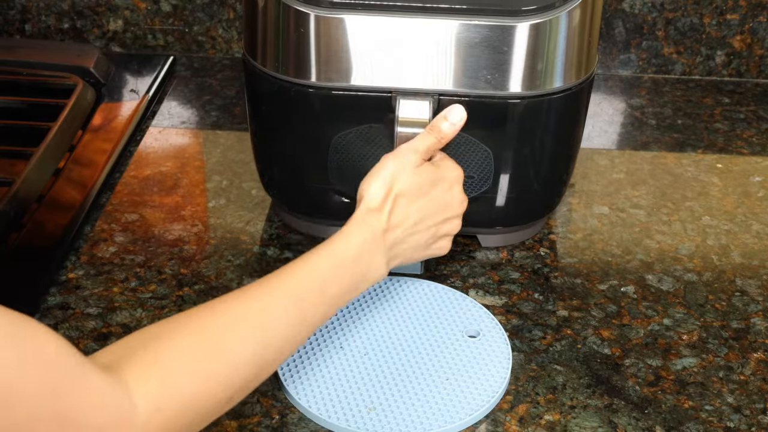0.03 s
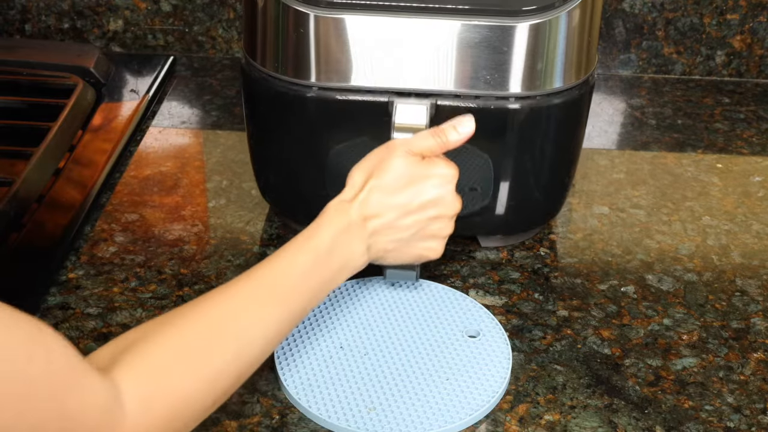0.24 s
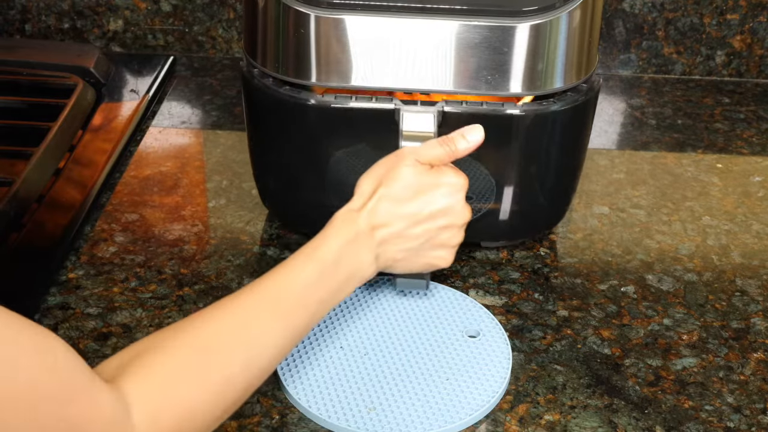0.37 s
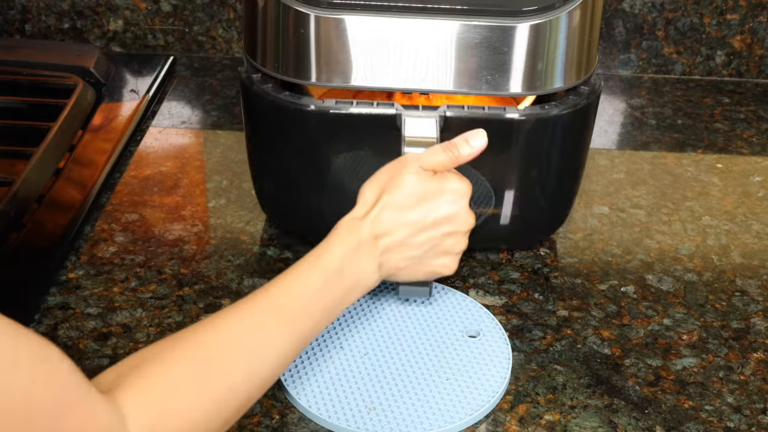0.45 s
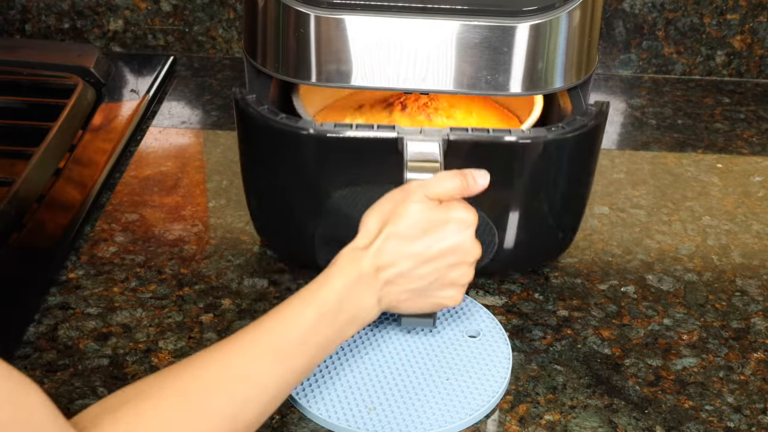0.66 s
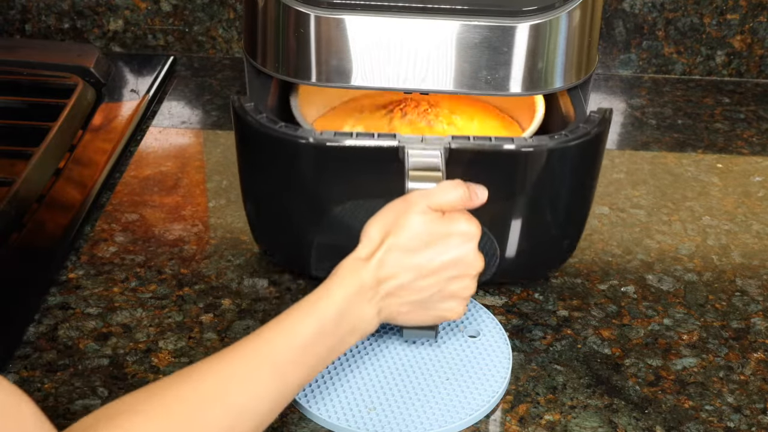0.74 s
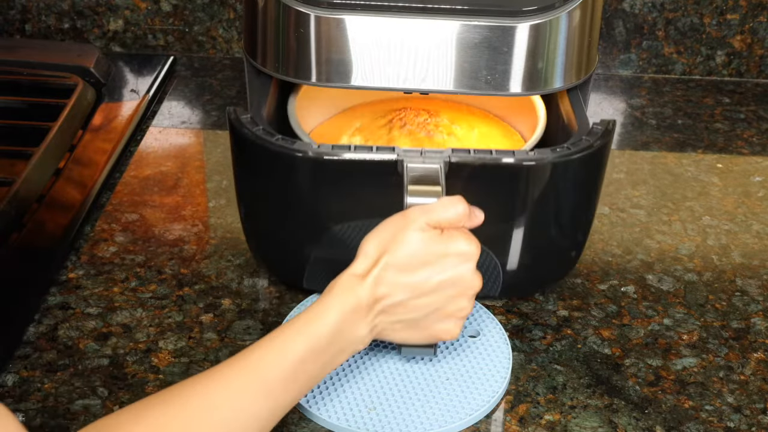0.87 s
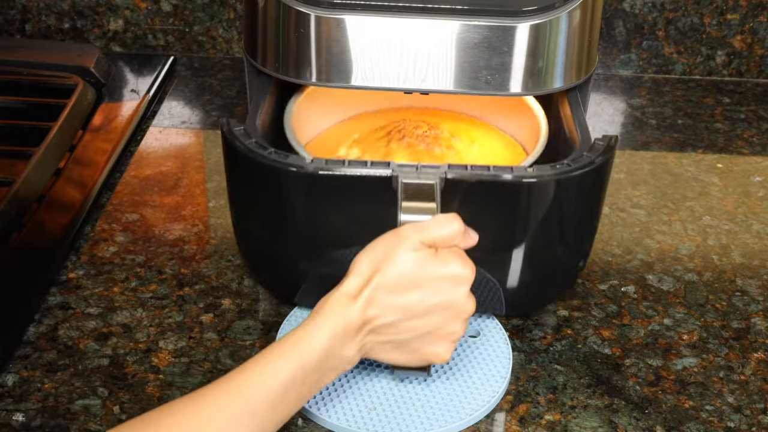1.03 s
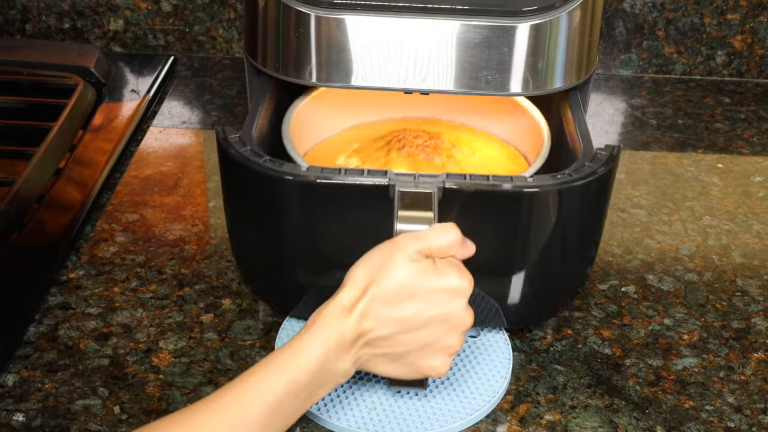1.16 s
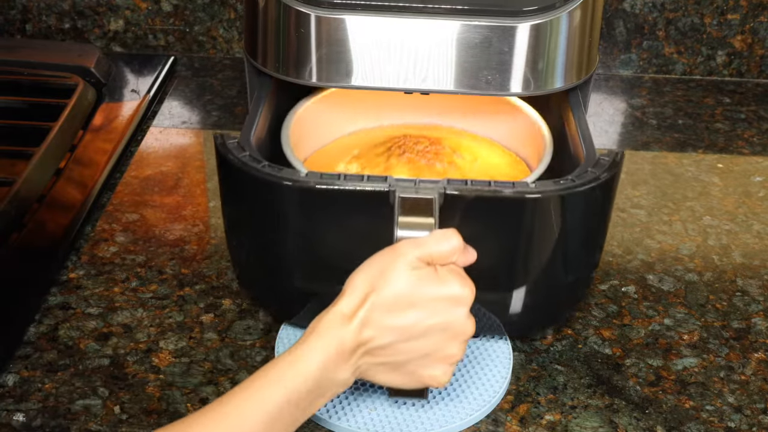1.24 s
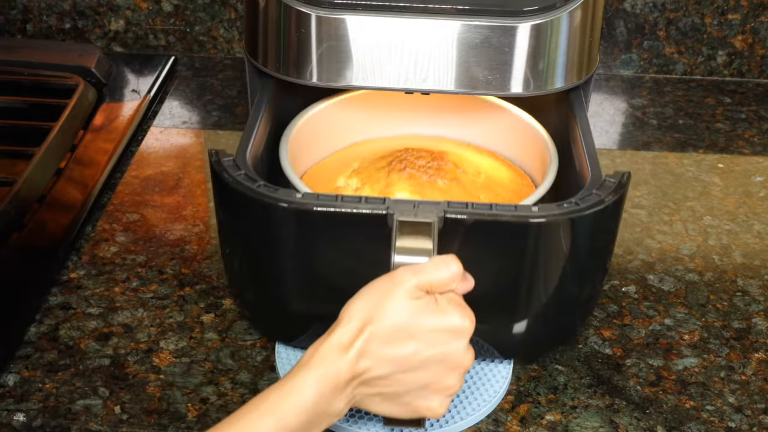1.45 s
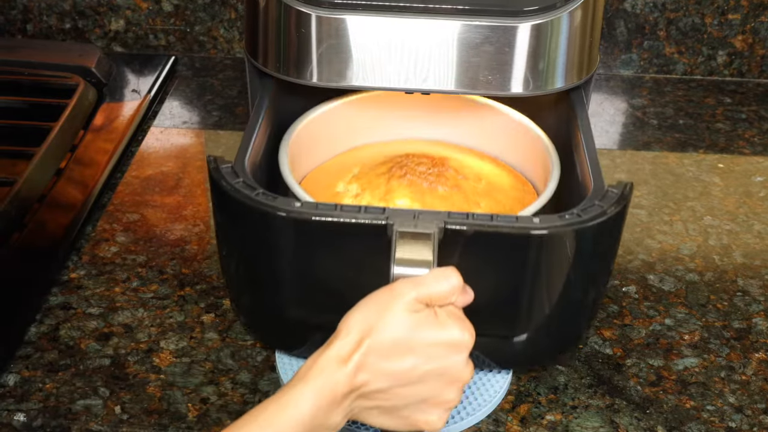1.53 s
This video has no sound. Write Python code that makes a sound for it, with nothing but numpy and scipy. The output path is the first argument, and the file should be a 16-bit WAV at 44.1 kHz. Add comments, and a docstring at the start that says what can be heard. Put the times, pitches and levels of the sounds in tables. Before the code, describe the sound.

An air fryer basket is pulled open in a quiet kitchen. Its catch lets go with a hard plastic clack, then the basket knocks dully and slides out with a soft scrape and faint squeaks, slightly to the right.

```python
"""An air fryer basket is pulled open on a stone counter in a kitchen.
A hand brushes the handle; the catch creaks under strain and lets go with a hard plastic clack that
rings the housing. The basket knocks dully on its runners and slides out with a soft stick-slip scrape
and faint squeaks, then bumps again more lightly as the pull slows and the scrape dulls.
Quiet room noise and mains hum lie underneath throughout."""
import sys
import numpy as np
from scipy import signal
from scipy.fft import rfft, irfft
from scipy.io import wavfile
from scipy.ndimage import uniform_filter1d

SR = 44100
rng = np.random.default_rng(int(sys.argv[2]) if len(sys.argv) > 2 else 0)


def file_out(sig):
    """Save sig as 16-bit WAV at sys.argv[1]."""
    # one column per channel
    cols = np.atleast_2d(sig).T
    # limit, then scale
    lim = np.clip(cols, -1, 1)
    pcm = np.round(lim * 32767).astype(np.int16)
    wavfile.write(sys.argv[1], SR, pcm)


N = 70560
T = np.arange(N) / SR

# stereo image of the room, narrow lows and wide highs: (frequency [Hz], left-right likeness [0..1])
ROOM_LIKENESS = [(100, 0.92), (500, 0.91), (1200, 0.6), (2800, 0.099), (6000, 0), (12000, 0.082)]


def catch():
    """The plastic catch creaks ever louder under strain, lets go with a crack and shakes the housing."""
    # hits as the catch strains and snaps free: (time [s], level [dB], dull above [Hz], thin below [Hz])
    hits = [(.2275, -18.5, 705, 250), (.2342, -21, 6000, 600), (.2424, -5, 5000, 1400),
            (.2490, -12.5, 5000, 397), (.2530, -2, 900, 201), (.2558, 0.5, 830, 197),
            (.2578, -0.5, 13000, 690), (.2623, -4, 7700, 388), (.2652, -1.5, 3500, 250),
            (.2895, -11, 700, 202)]
    # ringing tail of the housing: (frequency [Hz], level [dB], t60 [s])
    housing_modes = [(113.6, -26.5, 0.138), (176.95, -20, 0.62), (213, -33.5, 0.41), (244.3, -39, 0.78),
                     (285.2, -30, 0.84), (332.6, -31, .3), (391.7, -30.5, 0.99), (402.4, -22.5, 0.22),
                     (440.5, -28.5, 0.21), (489.1, -21, 0.32), (561, -32.5, 0.27), (929, -20.5, 0.096),
                     (1124.4, -34, 0.22), (1502, -30, 0.15), (2094, -26, 0.17), (2510, -23.5, .25),
                     (2765, -36, 0.21), (3320, -29, 0.043), (3860, -27, 0.1), (5263, -26.5, 0.05)]
    # body of the clack, the housing's dense, short-lived modes: (frequency [Hz], gain [dB])
    housing_colour = [(25, -32), (70, 15), (110, -10.5), (145, 6.5), (180, 9.5), (450, 8.5), (620, 4.5),
                      (1100, 3.5), (1700, 1), (3300, 4), (5500, -2.5), (8800, -7.5), (10800, -13),
                      (13000, -2.5), (16000, -9)]
    # bright EQ of creak and crack: (frequency [Hz], gain [dB])
    snap_colour = [(500, -49), (1500, -33), (3300, 1), (5500, 2), (8800, 8), (10800, -4), (13000, 10),
                   (16000, -2)]
    strain_s, snap_s = .2342, .2578
    creak_db, creak_rise_db, crack_db = -45.5, 12, 0.5
    strain = (T - strain_s) / (snap_s - strain_s)
    straining = (strain > 0) & (strain < 1)
    creak = slips() * straining * from_db(creak_db + creak_rise_db * np.clip(strain, 0, 1))
    crack = from_db(crack_db) * through(click(snap_s), burst(t60=0.0018))
    clack = struck(hits, housing_modes, housing_colour, dense_db=11.5, t60=0.052, wet_db=-4)
    return coloured(creak + crack, snap_colour) + clack


def knocks():
    """The basket bumps dully on its runners, early in the pull and again near its end."""
    # bumps on the runners: (time [s], level [dB], dull above [Hz], thin below [Hz])
    hits = [(.3945, -5, 2260, 305), (.4005, 1, 2040, 1120), (.4045, -2.5, 510, 110),
            (.4150, -7.5, 880, 148), (.4325, -6, 280, 40), (.4675, 0.5, 2020, 700),
            (.4725, -3.5, 2170, 700), (.4790, -4.5, 1240, 248), (1.152, -12.5, 1350, 600),
            (1.2765, -12, 926, 380), (1.2815, -5, 1020, 382), (1.304, -14, 1220, 506)]
    # ringing tail of the basket: (frequency [Hz], level [dB], t60 [s])
    basket_modes = [(176, -39, 0.25), (200.8, -37.5, 0.23), (247, -36, 0.16), (281.6, -46.5, 0.51),
                    (389.6, -41, 0.23), (403, -41.5, 0.26), (560, -43.5, 0.71), (760, -34, 0.099),
                    (856, -30, 0.1), (922, -39, 0.16), (1053, -40, 0.07), (1418, -36.5, 0.097),
                    (1543, -38, 0.14), (1623, -40, 0.11)]
    # body of the knock, the basket's dense modes: (frequency [Hz], gain [dB])
    basket_colour = [(30, -22), (110, 1.5), (145, -14), (180, 10), (400, 13), (640, 2.5), (800, 3),
                     (1600, 1.5), (3000, -5.5), (6000, -13.5), (14000, -7)]
    return struck(hits, basket_modes, basket_colour, dense_db=2, t60=0.062, wet_db=-1)


def slide():
    """Slips and smooth rubbing on the runners ring basket and room; the scrape dulls as the pull slows."""
    # friction envelope of the sliding basket: (time [s], level [dB])
    friction = [(.3, -14.5), (.48, -1), (.65, 1), (.87, -1), (1.0, -4), (1.08, -1), (1.17, 1), (1.26, -1.5),
                (1.45, -1), (1.6, -10)]
    # soft, mid-heavy EQ of the scrape: (frequency [Hz], gain [dB])
    scrape_colour = [(80, -17), (145, -16.5), (180, -3), (420, 0), (700, 0.5), (900, 2.5), (1300, -2),
                     (2500, -6.5), (5000, -16), (9000, -26), (15000, -28.5)]
    # resonances of the runners and the oven cavity: (frequency [Hz], width [Hz], boost [dB])
    resonances = [(178, 13, 6.5), (241, 8.6, 5.5), (407, 13, 8.5), (851, 26, 5.5), (920, 9.2, 8),
                  (1260, 20, 5.5), (1530, 53, 4)]
    friction_db, wet_db = -39, 1
    slows_at_s, dulling_db_per_s, dulls_above_hz = 1, 30, 1400

    def resonance_gain(hz):
        return 1 + sum((from_db(db) - 1) / (1 + 2j * (hz - centre) / width)
                       for centre, width, db in resonances)

    rubbing = (slips()[0] + 2 * rng.standard_normal(N)) / np.sqrt(5)
    force = rubbing * from_db(friction_db + np.interp(T, *np.transpose(friction)))
    response = (burst(t60=0.052) + from_db(wet_db) * kitchen()) / np.sqrt(2)
    scrape = coloured(through(force, response), scrape_colour)
    scrape = shaped(scrape, resonance_gain)
    bass = cut(scrape, dulls_above_hz, "low", order=1)
    treble_fade = from_db(-dulling_db_per_s * np.maximum(T - slows_at_s, 0))
    return bass + (scrape - bass) * treble_fade


def squeaks():
    """The runners stick and slip in brief, unsteady tones that sag in pitch as they fade."""
    # runner squeaks: (time [s], length [s], starting pitch [Hz], level [dB])
    cues = [(0.72, 0.046, 885, -59), (0.895, 0.049, 945, -44), (1.005, 0.042, 905, -52.5),
            (1.135, 0.1, 919, -55), (1.15, 0.081, 3190, -59), (1.446, .05, 925, -60)]
    attack_s, sag_hz_per_s, wobble_share, wet_db = 0.0042, 760, 0.0283, -5
    tones = 0
    for s, length, hz, db in cues:
        age = np.clip(T - s, 0, length)
        wobble = cut(rng.standard_normal(N), 84, "low")
        pitch = hz - sag_hz_per_s * age + wobble_share * hz * wobble / wobble.std()
        envelope = np.minimum(age / attack_s, 1) * np.sqrt(1 - age / length)
        tones = tones + from_db(db) * envelope * np.sin(2 * np.pi * np.cumsum(pitch) / SR)
    return tones + from_db(wet_db) * through(tones, kitchen())


def grip():
    """Skin brushes over the handle before the pull: one short swell of noise."""
    # EQ of skin on the handle: (frequency [Hz], gain [dB])
    skin_colour = [(300, 5), (1500, -3), (3000, -0.5), (5000, 3), (9000, -11), (15000, -7)]
    peak_s, width_s, level_db = 0.16, 0.02, -52
    swell = np.exp(-.5 * ((T - peak_s) / width_s) ** 2)
    return from_db(level_db) * swell * coloured(stereo_noise(ROOM_LIKENESS), skin_colour)


def struck(hits, modes, colour, dense_db, t60, wet_db):
    """Each hit rings a body's clear modes and a short burst of dense ones, and echoes in the room."""
    forces = [from_db(db) * cut(cut(click(s), dull_hz, "low"), thin_hz, "high", order=1)
              for s, db, dull_hz, thin_hz in hits]
    dense = sum(through(force, burst(t60)) for force in forces)
    room = from_db(wet_db) * through(sum(forces), kitchen())
    tail = cut(ring(sum(forces), modes), 87, "high")
    return tail + from_db(dense_db) * coloured(dense + room, colour)


def ring(force, modes):
    """A body's clear modes: decaying sines set off by the force."""
    response = sum(from_db(db - 60 * T / t60) * np.sin(2 * np.pi * hz * T) for hz, db, t60 in modes)
    return through(force, response[None])


def slips():
    """Tiny random slips of plastic on plastic, each ringing briefly; rms about 1."""
    slips_per_s, spread_db = 2500, 2.5
    sizes = rng.choice([-1, 1], N) * from_db(spread_db * np.minimum(rng.exponential(1, N), 4))
    clicks = (rng.random(N) < slips_per_s / SR) * sizes
    return through(clicks / clicks.std(), burst(t60=0.013))


def burst(t60):
    """Many short-lived modes: a dying stereo noise whose spectrum is evened out."""
    # stereo image of the direct sound: (frequency [Hz], left-right likeness [0..1])
    near_likeness = [(100, 1), (500, 0.98), (1200, 0.46), (3000, 0.54), (12000, 1)]
    even_over_hz = 500
    spectrum = rfft(stereo_noise(near_likeness) * dying(t60), 2 * N)
    power = np.mean(abs(spectrum) ** 2, axis=0)
    smooth_power = uniform_filter1d(power, int(even_over_hz * 2 * N / SR))
    return irfft(spectrum / np.sqrt(smooth_power))[:, :N]


def kitchen():
    """Diffuse room reverb, dying band by band, the highs soonest."""
    # decay of the room: (frequency [Hz], t60 [s])
    room_t60 = [(100, 0.63), (300, 0.51), (1000, 0.63), (3000, 0.29), (7000, 0.32), (14000, 0.23)]
    noise, centres = stereo_noise(ROOM_LIKENESS), np.geomspace(100, 14000, 9)
    reverb = 0
    for centre, weights in zip(centres, np.eye(len(centres))):
        band = shaped(noise, lambda hz: at_hz(list(zip(centres, weights)), hz))
        reverb = reverb + band * dying(at_hz(room_t60, centre), build_s=0.002)
    return reverb


def background():
    """A steady bed of room noise and mains hum."""
    # dark EQ of the room tone: (frequency [Hz], gain [dB])
    room_colour = [(25, -11), (60, -5), (130, 0.5), (260, -0.5), (600, -1), (1200, -13.5), (2500, -14.5),
                   (5000, -19.5), (9000, -24.5), (15000, -27)]
    noise_db, hum_hz, hum_db = -41, 58.9, -63.5
    room_tone = from_db(noise_db) * coloured(stereo_noise(ROOM_LIKENESS), room_colour)
    return room_tone + from_db(hum_db) * np.sin(2 * np.pi * hum_hz * T)


def stereo_noise(likeness):
    """White noise whose two sides are alike by a share that depends on frequency."""
    mid, side = rng.standard_normal((2, N))
    alike = lambda hz: np.clip(at_hz(likeness, hz), -1, 1)
    mid = shaped(mid, lambda hz: np.sqrt((1 + alike(hz)) / 2))
    side = shaped(side, lambda hz: np.sqrt((1 - alike(hz)) / 2))
    return np.array([mid + side, mid - side])


def dying(t60, build_s=1e-9):
    """Exponential decay of unit energy, with an optional soft attack."""
    attack = 1 - np.exp(-(T + 1 / SR) / build_s)
    envelope = attack * from_db(-60 * np.minimum(T / t60, 5))
    return envelope / np.linalg.norm(envelope)


def click(s):
    """A unit impulse at s seconds."""
    return signal.unit_impulse(N, int(s * SR))


def through(x, response):
    """Play a signal through an impulse response."""
    return signal.fftconvolve(np.atleast_2d(x), response, axes=-1)[:, :N]


def coloured(x, colour):
    """Minimum-phase EQ along a curve of (frequency [Hz], gain [dB])."""
    gain = from_db(at_hz(colour, np.fft.rfftfreq(2 * N, 1 / SR)))
    cepstrum = irfft(np.log(gain))
    cepstrum[1:N] *= 2   # folded onto positive time, so nothing rings ahead of a hit
    cepstrum[N + 1:] = 0
    return shaped(x, lambda hz: np.exp(rfft(cepstrum)))


def shaped(x, gain):
    """Apply a gain given as a function of frequency."""
    return irfft(rfft(x, 2 * N) * gain(np.fft.rfftfreq(2 * N, 1 / SR)))[..., :N]


def cut(x, hz, kind, order=2):
    """Butterworth low- or high-pass."""
    sos = signal.butter(order, np.clip(hz, 10, SR / 2 - 1000), kind, fs=SR, output="sos")
    return signal.sosfilt(sos, x + 1e-18)


def at_hz(points, hz):
    """Read a table on a log-frequency axis."""
    frequencies, values = np.transpose(points)
    return np.interp(np.log(np.maximum(hz, 1)), np.log(frequencies), values)


def from_db(db):
    """Decibels to gain."""
    return 10 ** (np.asarray(db) / 20)


def scene():
    """The fryer sits a little to the right, louder and earlier on that side, over the room's bed."""
    # pan of the fryer: (frequency [Hz], right minus left [dB])
    balance = [(100, 1.3), (500, 1.2), (1200, 2), (3000, 4), (6000, 1.5), (12000, 1.7)]
    left_lag_s = 1.2 / SR
    left, right = knocks() + catch() + slide() + squeaks() + grip()
    lag = lambda hz: np.exp(-2j * np.pi * hz * left_lag_s)
    left = shaped(left, lambda hz: from_db(-at_hz(balance, hz) / 2) * lag(hz))
    right = shaped(right, lambda hz: from_db(at_hz(balance, hz) / 2))
    return np.array([left, right]) + background()


def record(dry):
    """A steep low-pass takes the very top off the mix."""
    cutoff_hz = 16000
    return signal.sosfilt(signal.ellip(10, .1, 80, cutoff_hz, fs=SR, output="sos"), dry)


dry = scene()
out = record(dry)
file_out(out)
```